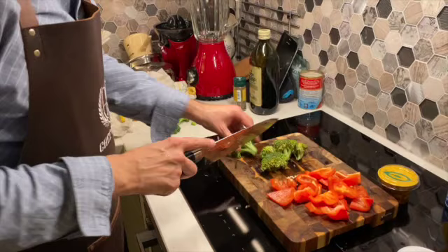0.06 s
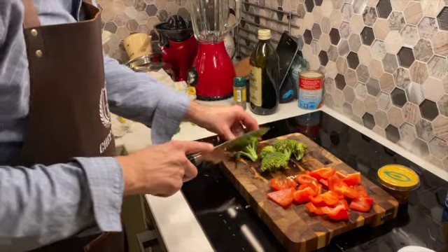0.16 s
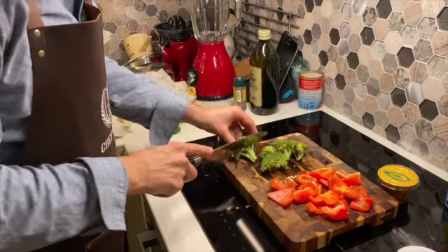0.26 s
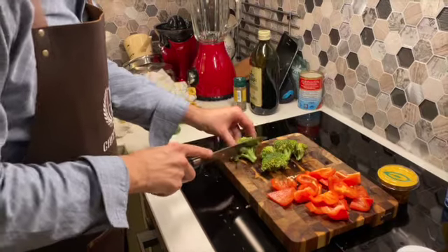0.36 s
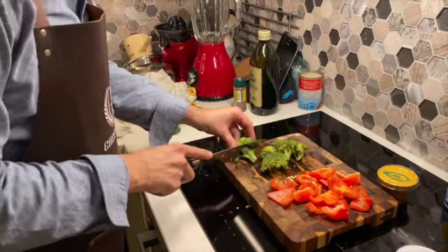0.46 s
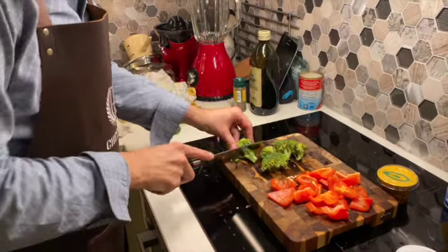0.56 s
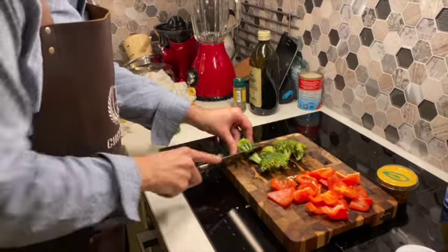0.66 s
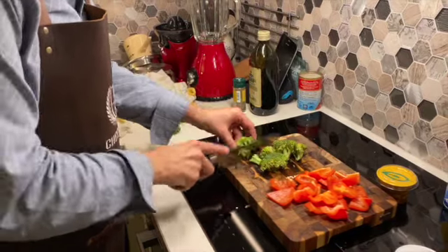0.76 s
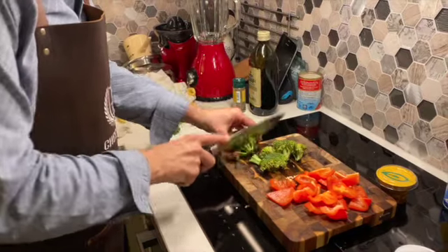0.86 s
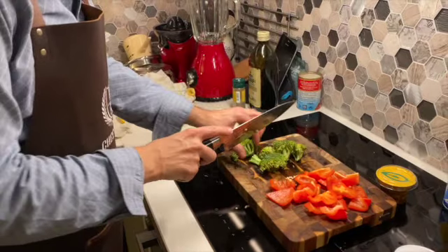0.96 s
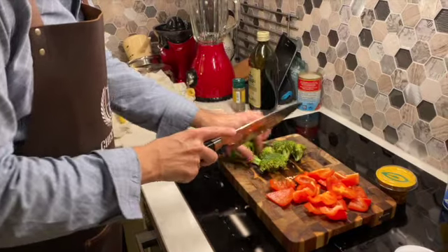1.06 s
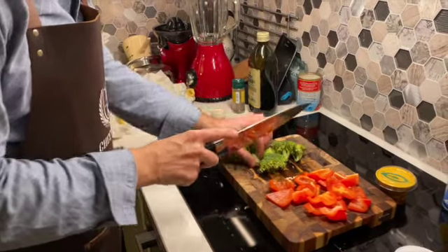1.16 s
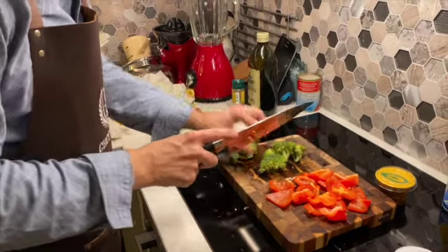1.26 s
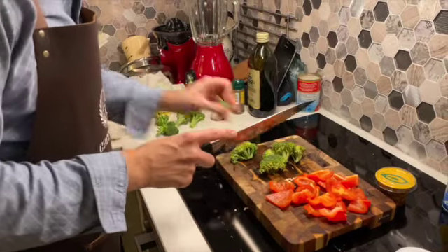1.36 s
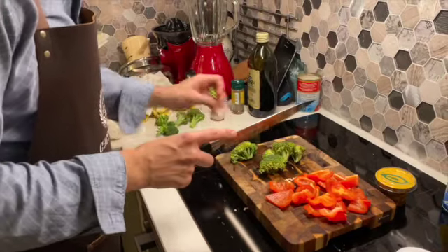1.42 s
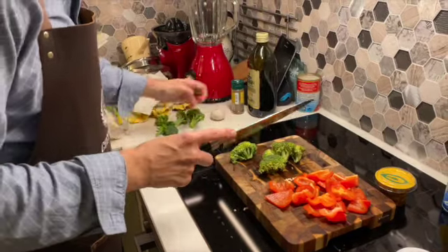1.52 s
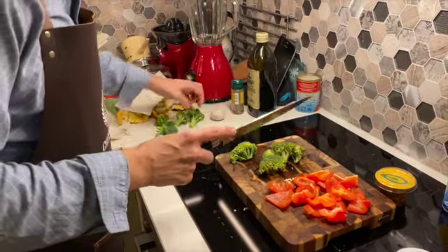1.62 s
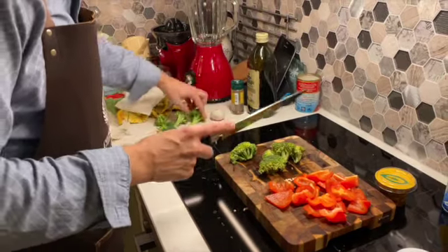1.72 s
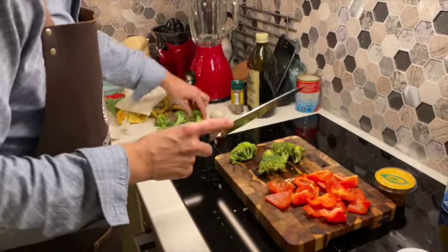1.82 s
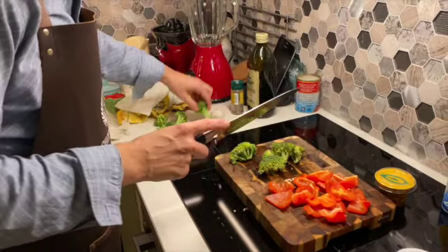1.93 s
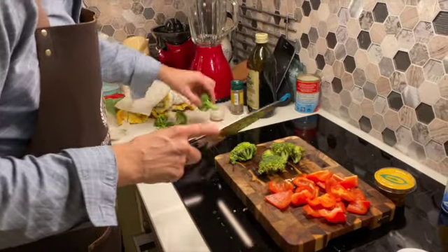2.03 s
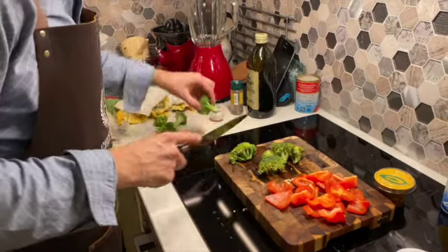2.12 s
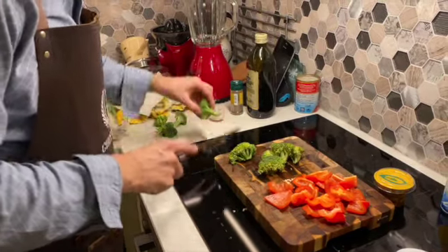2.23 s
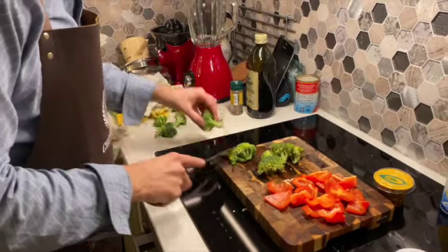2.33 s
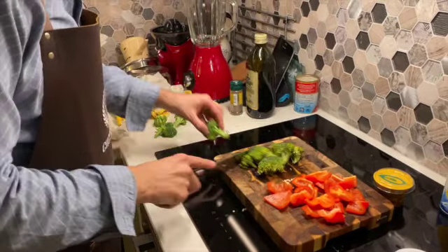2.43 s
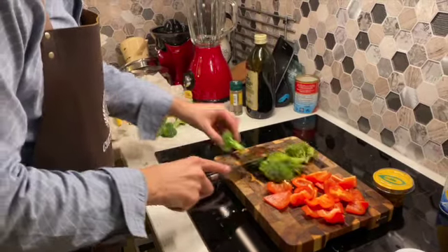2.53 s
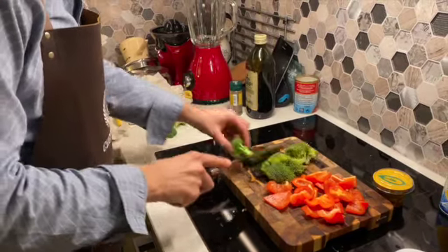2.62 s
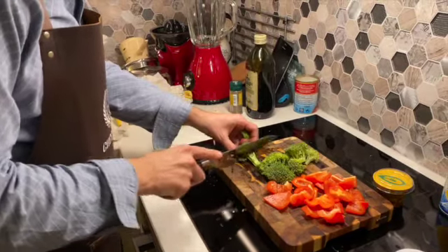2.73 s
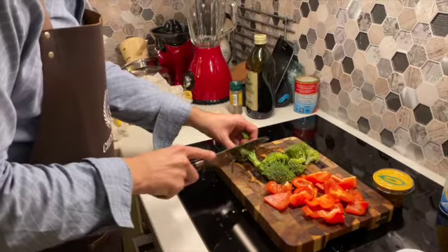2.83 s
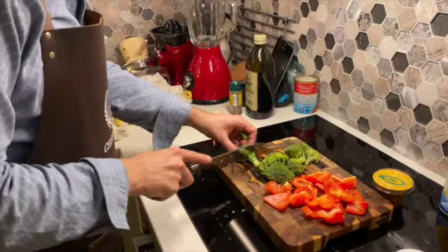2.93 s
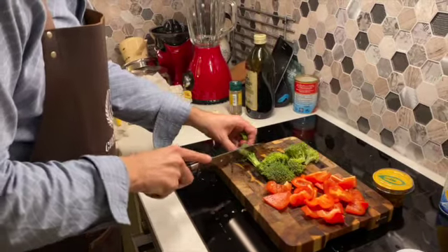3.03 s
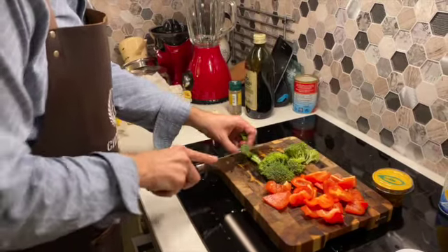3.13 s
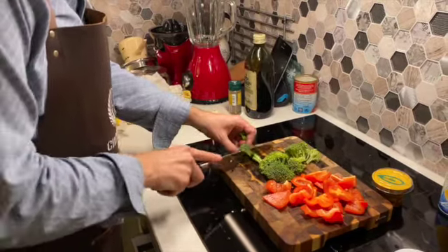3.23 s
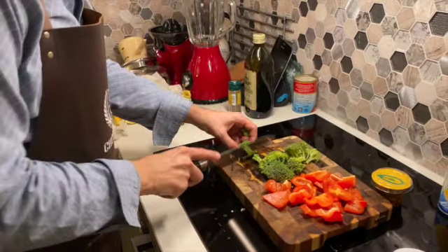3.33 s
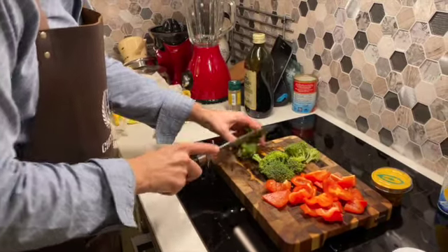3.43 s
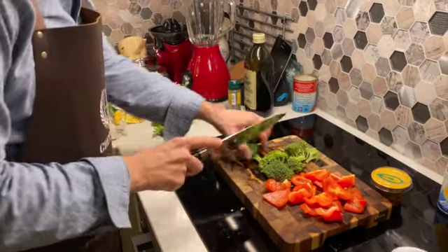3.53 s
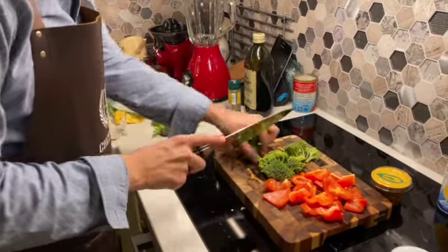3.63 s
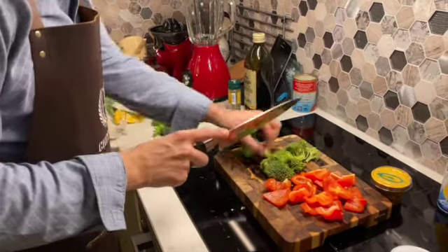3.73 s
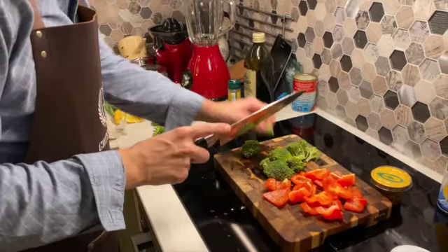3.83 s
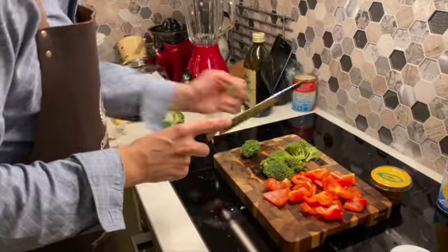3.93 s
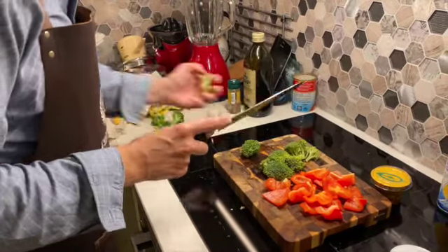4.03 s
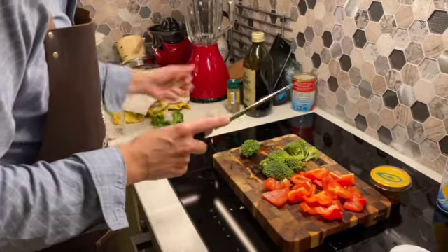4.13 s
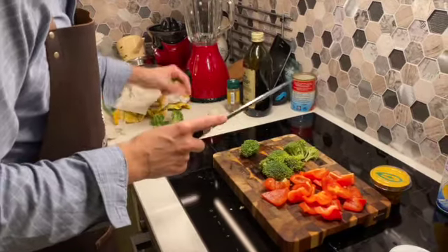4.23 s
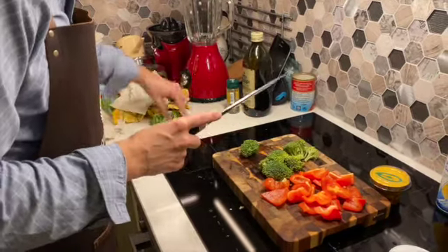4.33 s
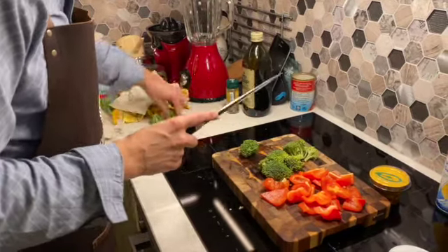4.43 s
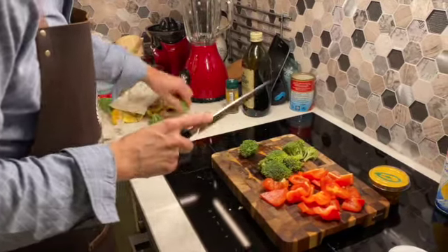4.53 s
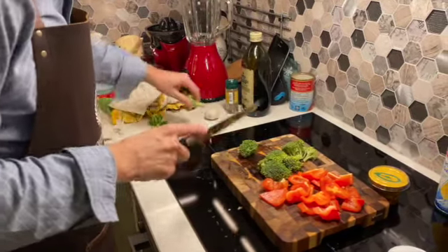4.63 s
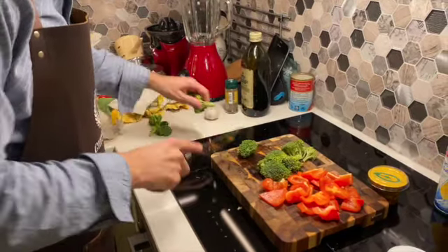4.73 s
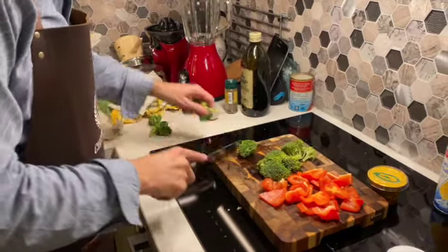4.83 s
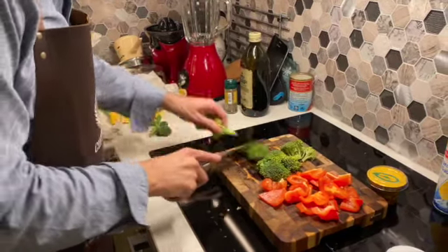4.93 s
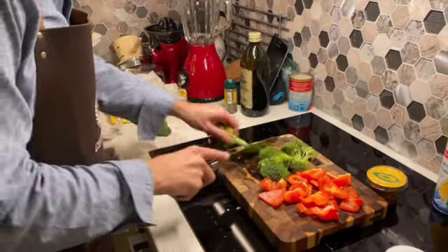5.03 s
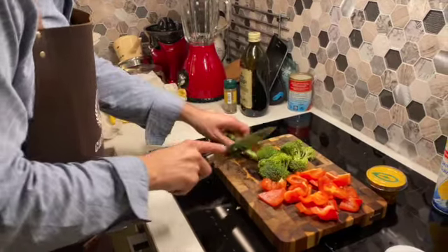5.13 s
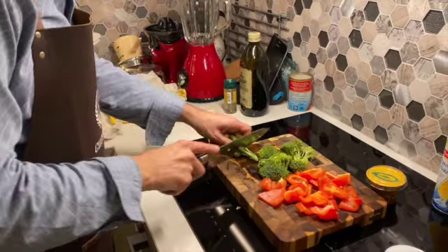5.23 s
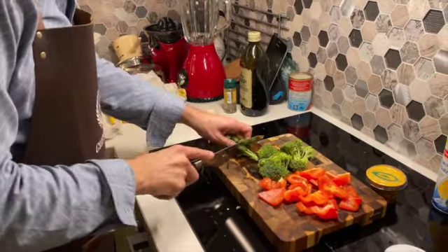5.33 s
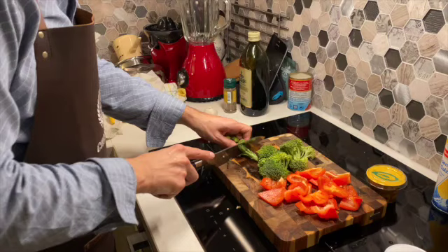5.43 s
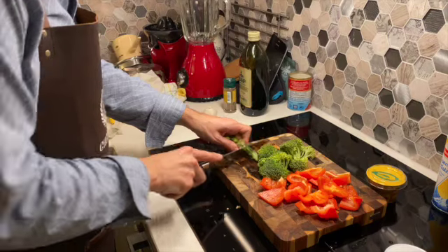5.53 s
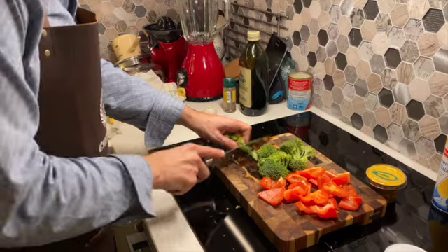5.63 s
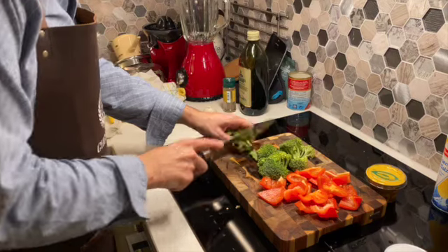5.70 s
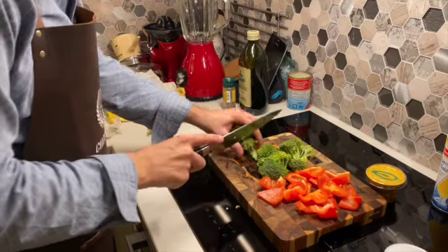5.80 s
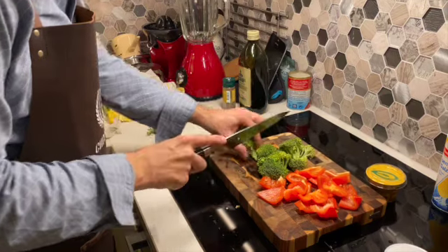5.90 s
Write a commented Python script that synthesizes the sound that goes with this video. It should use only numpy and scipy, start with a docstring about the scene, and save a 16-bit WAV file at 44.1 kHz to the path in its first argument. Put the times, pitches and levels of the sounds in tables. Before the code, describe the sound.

Close, loud chops on a wooden cutting board, each with a crisp stem crunch, separated by sleeve rustle, small ticks and brief steely drags.

```python
"""A chef's knife and a thick wooden board on a glass hob, small kitchen, two microphones close by.
From the start patchy noise makes a low room hum and the rustle of sleeves; scraps tick as short fuzzy rings.
Then chops: dense snaps crunch through a stem, and the blow sounds board and blade as noise and dying sines.
Between chops the blade is set down and dragged, ringing thinly as random slips feed its modes.
Sparse taps give the kitchen's echo; the loudest chops have flattened peaks."""
import sys
import numpy as np
from scipy import signal
from scipy.fft import rfft, irfft
from scipy.io import wavfile
from scipy.ndimage import uniform_filter1d

SR = 44100
rng = np.random.default_rng(int(sys.argv[2]) if len(sys.argv) > 2 else 0)


def log_audio(samples):
    """Write samples as a 16-bit WAV file to the path given in sys.argv[1]."""
    # one column per channel
    frames = np.atleast_2d(samples).T
    # limit to full scale, then quantise
    limited = np.clip(frames, -1, 1)
    pcm = np.round(limited * 32767).astype(np.int16)
    wavfile.write(sys.argv[1], SR, pcm)


N = 262836  # length in samples
STROKE_DEPTH_DB = 36  # how far a drag or a movement lies under its peak at the ends of its rise and fall


def gain_of(db):
    """Amplitude factor for a level in dB."""
    return 10 ** (np.asarray(db) / 20)


def evened(x):
    """Scales x to an RMS of one."""
    return x / np.sqrt(np.mean(x ** 2) + 1e-20)


def clock():
    """Time of every sample in seconds."""
    return np.arange(N) / SR


def read(points, hz):
    """Value of a spectrum table at hz, interpolated along log frequency."""
    f, value = np.transpose(points)
    return np.interp(np.log(hz + 1), np.log(f + 1), value)


def add(mix, s, sound):
    """Mixes a stereo sound in at s seconds."""
    part = mix[:, round(s * SR):][:, :sound.shape[-1]]
    part += sound[..., :part.shape[1]]


def coloured(x, points):
    """Filters x by a spectrum table in dB."""
    hz = np.fft.rfftfreq(x.shape[-1], 1 / SR)
    return irfft(rfft(x) * gain_of(read(points, hz)), x.shape[-1])


def level(strokes):
    """Gain over time from strokes (full at s, hold s, dB, rise s, fall s)."""
    t, total = clock(), 0
    for s, hold, db, rise, fall in strokes:
        before = np.maximum(s - t, 0) / rise
        after = np.maximum(t - s - hold, 0) / fall
        total = total + gain_of(db - STROKE_DEPTH_DB * (before + after))
    return total


def pair(same):
    """Two channels of white noise whose likeness is `same`."""
    a, b = rng.standard_normal((2, N))
    return np.array([a, same * a + np.sqrt(1 - same ** 2) * b])


def rings(modes, t, spread):
    """Dying sines, modes x channels x time; neighbours start in opposite directions, a little apart in each ear."""
    hz, db, t60 = np.transpose(modes)[:3, :, None, None]
    sign = (-1.) ** np.arange(len(modes))[:, None, None]
    apart = spread * np.log2(1 + hz / 300) * np.array([[.5], [-.5]]) * sign
    return sign * gain_of(db - 60 * t / t60) * np.sin(2 * np.pi * hz * t + apart)


def as_curve(gain):
    """A gain over time as (s, dB) rows."""
    return np.transpose([clock(), 20 * np.log10(gain + 1e-5)])


# Left-right likeness of the background. Each row: frequency in Hz, likeness (1 is identical).
LIKENESS = [(60, 1), (180, 0.64), (550, 0.42), (1650, -0.04), (4970, 0.0038), (15000, 0.16)]


def air(points, curve, lo_hz, hi_hz, split_hz, patchy_db):
    """Patchy noise; the curve sets the relative level of band lo-hi and mostly moves what is below split_hz."""
    frames, hz = N // 256 + 5, np.fft.rfftfreq(1024, 1 / SR)
    a, b, c, d, patches = rng.standard_normal((frames, 513, 5)).T
    # smoothing over frequency, then time, makes patches of louder and softer noise
    patches = evened(uniform_filter1d(uniform_filter1d(patches, 14, 0), 10, 1))
    same = np.clip(read(LIKENESS, hz), -1, 1)[:, None]
    left = a + 1j * b
    z = np.array([left, same * left + np.sqrt(1 - same ** 2) * (c + 1j * d)])
    shape = gain_of(read(points, hz))
    db = np.interp(np.arange(frames) * 256 / SR, *np.transpose(curve))
    share = 1 / (1 + (hz[:, None] / split_hz) ** 2)  # treble stays nearer the median level
    z *= shape[:, None] * gain_of(share * db + (1 - share) * np.median(db) + patchy_db * patches)
    band = np.sqrt(np.sum(shape[(hz > lo_hz) & (hz < hi_hz)] ** 2))
    return signal.istft(z, nperseg=1024, noverlap=768)[1][:, :N] / band


# Drift of the low room hum. Each row: time in seconds, relative level in dB.
HUM_DRIFT = [(0.0, -53.5), (0.3, -55), (1.3, -56), (1.76, -59.5), (2.27, -55), (3.0, -56.5), (3.9, -55.5),
             (4.45, -58), (5.2, -55), (5.96, -57.5)]
# Spectrum of the hum as heard. Each row: frequency in Hz, relative density in dB per Hz.
HUM_SPECTRUM = [(15, -37.5), (28, -17), (45, 3), (60, 3), (125, -0.5), (200, -9.5), (400, -15), (800, -26),
                (1600, -31.5), (3200, -36), (7800, -37.5), (9100, -46.5), (10800, -36.5), (12300, -41.5),
                (14000, -58.5)]


def room_hum():
    """The room hums as patchy, drifting noise; after each blow the counter booms on in it."""
    steady = gain_of(np.interp(clock(), *np.transpose(HUM_DRIFT)))
    boom = after_blows(start_db=-47, db_per_s=24.5, follows=.5)
    curve = as_curve(np.hypot(steady, boom))
    return gain_of(3.5) * air(HUM_SPECTRUM, curve, 30, 250, 270, patchy_db=2.0)


# Sleeves and hands moving.
# Each row: full at seconds, hold in seconds, relative level in dB, rise in seconds, fall in seconds.
MOVES = [(0.0, 0.19, -60, .1, 0.16), (0.444, .01, -72, 0.034, 0.14), (1.38, 0.071, -63.5, 0.049, 0.22),
         (1.75, 0.034, -80, 0.24, 0.36), (2.175, 0.12, -56, 0.16, 0.077), (2.898, .005, -81, .015, 0.083),
         (3.02, 0.058, -68, 0.074, 0.11), (3.55, 0.12, -64, 0.54, 0.56), (3.87, 0.23, -66.5, .3, .12),
         (4.232, .01, -74.5, 0.11, 0.13), (4.4, .02, -74.5, 0.088, .25), (4.66, 0.16, -59.5, 0.11, 0.092),
         (5.89, 0.011, -68, 0.37, 0.15)]
# Spectrum of the rustle as heard. Each row: frequency in Hz, relative density in dB per Hz.
RUSTLE_SPECTRUM = [(100, -11.5), (200, -4), (470, -8), (1000, -10.5), (2200, -17), (4500, -22.5),
                   (7600, -22.5), (9000, -39), (11000, -25), (12500, -34), (15500, -52)]


def sleeves():
    """Sleeves rustle as patchy noise with each movement; after each blow a soft hiss lingers in it."""
    hiss = after_blows(start_db=-54.5, db_per_s=36.5, follows=0.94)
    curve = as_curve(np.hypot(level(MOVES), hiss))
    return gain_of(3.5) * air(RUSTLE_SPECTRUM, curve, 1500, 14000, 40000, patchy_db=3.0)


# Small ticks and knocks of scraps and fingers.
# Each row: start in seconds, relative level in dB, pitch in Hz, t60 in seconds, sharpness from 0 to 1.
TICKS = [(0.294, -66.5, 8000, 0.021, 0.3), (0.434, -62, 1880, 0.08, 0.6), (0.457, -56, 1830, 0.064, 0.5),
         (1.09, -37, 75, .2, 0.39), (1.377, -43, 444, 0.21, 0.06), (1.376, -58.5, 1937, 0.16, 0.2),
         (1.377, -67, 2550, 0.25, 0.1), (1.375, -58, 5000, 0.2, 0.55), (1.39, -52, 974, 0.23, 0),
         (1.73, -61, 592, 0.13, 0.54), (2.652, -41, 1168, 0.062, 0.06), (2.652, -51, 1844, 0.046, 0.16),
         (2.705, -48, 585, 0.15, 0.01), (2.895, -58.5, 5030, 0.059, 0.98), (3.299, -33.5, 117, 0.11, 0),
         (3.458, -37, 110.2, 0.15, 0), (3.59, -40, 130, 0.2, 0.25), (4.073, -58, 4020, 0.037, 0.75),
         (4.4, -65, 5004, 0.048, 0.95), (5.291, -55.5, 910, 0.12, .7), (5.416, -58, 2500, .1, 0.07),
         (5.89, -53, 7130, 0.028, 0.8)]


def scraps():
    """Each tick mixes a short fuzzy ring with crisp noise; the sharper, the more noise and the faster its rise."""
    t, out = np.arange(SR // 4) / SR, np.zeros((2, N))
    for s, db, hz, t60, sharp in TICKS:
        fuzz = rng.standard_normal((2, len(t))) + 2.2 * rng.standard_normal(len(t))  # mostly shared
        peak = signal.iirpeak(hz, 6., SR)
        ring = evened(signal.lfilter(*peak, signal.lfilter(*peak, fuzz)))
        crisp = evened(coloured(fuzz, CRUNCH_SPECTRUM))
        rise = 1 - np.exp(-t * hz / (2 + 16 * (1 - sharp)))
        add(out, s, gain_of(db - 60 * t / t60) * rise * ((1 - sharp) * ring + sharp * crisp))
    return gain_of(6.0) * out


# How fast the kitchen's echo dies. Each row: frequency in Hz, t60 in seconds.
KITCHEN_DECAY = [(60, .45), (200, 0.39), (600, 0.43), (1500, 0.31), (4000, 0.38), (8000, 0.25),
                 (14000, 0.29)]


def kitchen(x):
    """The room answers with sparse taps of random sign, each band dying at its own speed."""
    taps = np.zeros((2, SR // 2))
    at = np.arange(160, SR // 2 - 20, 20) + rng.integers(0, 20, (2, (SR // 2 - 161) // 20))
    np.put_along_axis(taps, at, rng.choice([-1., 1.], at.shape), 1)
    taps += .5 * taps[::-1]  # each ear gets some of the other's taps
    hz, t, z = signal.stft(taps, SR, nperseg=512)
    tail = signal.istft(z * gain_of(-60 * t / read(KITCHEN_DECAY, hz)[:, None]), SR, nperseg=512)[1]
    return signal.fftconvolve(x, tail / np.linalg.norm(tail[0]), axes=1)[:, :N]


# The edge splits a stem.
# Each row: breaks through at seconds, relative crunch level in dB, time to get through in seconds.
CUTS = [(0.617, -27.5, 0.12), (3.107, -29.5, 0.11), (5.426, -44, 0.045), (5.476, -27, 0.056)]
CUT_DEPTH_DB, CUT_BEND, CUT_STOP_DB_PER_S = 47.5, .6, 549.5  # growth, its bend (fastest at the end), stop


def cutting():
    """Force on the fibres: grows until the edge is through."""
    t, force = clock(), 0
    for s, db, length in CUTS:
        growth_db = CUT_DEPTH_DB * (np.maximum(s - t, 0) / length) ** CUT_BEND
        stop_db = CUT_STOP_DB_PER_S * np.maximum(t - s, 0)
        force = force + gain_of(db - growth_db - stop_db)
    return force


# Spectrum of the crunch as heard, used for ticks and scraping too.
# Each row: frequency in Hz, relative density in dB per Hz.
CRUNCH_SPECTRUM = [(180, -34.5), (300, -1.5), (3510, -6.5), (6460, -9), (7250, 1.5), (8990, -20),
                   (10400, 0), (11900, -8), (13400, -23), (15500, -10.5)]


def stems():
    """Fibres snap in dense clicks of uneven size, about 5000 a second, over a fainter steady noise."""
    snap_size = gain_of(3. * np.minimum(rng.exponential(1, N), 4))
    snaps = snap_size * (rng.random(N) < 5000 / SR)
    crunch = coloured(snaps * pair(0.22) + 0.25 * pair(.4), CRUNCH_SPECTRUM)
    return gain_of(4.5) * cutting() * evened(crunch)


# How fast the thud dies. Each row: frequency in Hz, t60 in seconds.
THUD_DECAY = [(60, 0.3), (300, .12), (1000, 0.097), (3000, 0.058), (10000, 0.018)]
# Spectrum of the thud as heard. Each row: frequency in Hz, relative density in dB per Hz.
THUD_SPECTRUM = [(40, -20), (100, 1), (500, 1), (1300, -7), (2600, -8), (4000, -18.5), (7600, -27),
                 (9000, -36), (11000, -31), (15500, -43)]


def thud(t):
    """The dull part of a blow: noise in octave bands, each rising and dying at its own speed."""
    noise = rng.standard_normal((2, len(t))) + 1.4 * rng.standard_normal(len(t))
    noise = evened(coloured(noise, THUD_SPECTRUM))
    out = 0
    for hz in 62.5 * 2 ** np.arange(9):
        band = coloured(noise, [(hz / 2, -60), (hz / 1.6, -6), (hz, 0), (hz * 1.25, -6), (hz * 2, -60)])
        out = out + band * (1 - np.exp(-t * hz / 3.7)) * gain_of(-60 * t / read(THUD_DECAY, hz))
    return out


# Board and hob modes. Each row: frequency in Hz, relative level in dB, t60 in seconds, rise in milliseconds.
BOARD_MODES = [(45, -22.5, 0.7, 20), (72.7, -5.5, 0.2, 9.2), (135, -7, 0.28, 11), (253.4, -8.5, 0.087, 7.2),
               (312.6, -2.5, 0.091, 2.2), (383.5, 0.5, 0.089, 3.1), (479, -6.5, 0.12, 4),
               (535.3, -9, 0.18, 2.1), (580, -8.5, 0.095, 8.8), (646, -3.5, 0.094, 4.5),
               (737, -6.5, .1, 2.6), (850, -13, .06, 19), (1026, -36, 0.67, 3), (1025, -36.5, .9, 3),
               (1229, 1.5, .04, 0.99), (1667, -5.5, 0.0082, 1), (1900, -5, 0.033, 0.65),
               (2100, -7.5, 0.012, .6), (2485, -6.5, 0.026, 0.54), (2691, -9, .018, 0.31)]
# Blade modes. Each row: frequency in Hz, relative level in dB, t60 in seconds.
BLADE_MODES = [(765, -7, .19), (1612, -12.5, 0.14), (2544, -8, 0.1), (4080, -2, 0.038), (4770, -6.5, 0.048),
               (6063, -0.5, 0.061), (6970, -10.5, .12), (7130, -5, 0.1), (7900, -7.5, 0.18),
               (8020, -8.5, 0.25), (9900, -11, 0.073), (10200, -10, 0.14), (10580, 4, 0.054),
               (11160, -8, 0.11), (11460, -2.5, 0.12), (12180, -8.5, .12), (14390, -11.5, .1),
               (14880, -13, .1)]
# The blade meets the board. Each row: start in seconds, relative blow level in dB,
# brightness in dB per octave above 1 kHz, heaviness in dB in the bass (full below 150 Hz, gone by 250 Hz),
# blade ring in dB against the blow, extra dB for the blade's slow flexing,
# left over right in dB before the microphones colour it.
BLOWS = [(0.6179, 5, 1, -1.5, -48.5, 1, 0.5), (2.2874, -8.5, -3.5, 0.5, -37.5, 13, 1.),
         (2.318, -27.5, -3.5, -2.5, -15, 22, -3), (2.4924, -20, -0.5, 9.5, -8, 3.5, -1),
         (3.109, 2, -0.5, 2.5, -49.5, 2.5, 0), (4.7955, -2.5, -1.5, -4, -39.5, -2.5, 1.5),
         (5.4769, 4, -1.5, 1, -81, 2.5, 1)]
PUNCH_DB, PUNCH_S = 3.5, 0.0023  # extra force on the thud in the first instant, and how fast it fades


def blows():
    """Each blow shakes board and blade: modes ring as dying sines, and the board thuds."""
    t, out = np.arange(SR // 2) / SR, np.zeros((2, N))
    rise_ms = np.transpose(BOARD_MODES)[3, :, None, None]
    # bending waves: treble arrives first
    board = rings(BOARD_MODES, t, spread=0.24) * (1 - np.exp(-1000 * t / rise_ms))
    blade = rings(BLADE_MODES, t, spread=.3)
    flexing = np.transpose(BLADE_MODES)[0, :, None, None] < 2000
    for s, db, bright_db, heavy_db, blade_db, flex_db, pan_db in BLOWS:
        spot = gain_of(1.5 * rng.standard_normal((len(BOARD_MODES), 1, 1)))  # where the edge lands
        punch_db = PUNCH_DB * np.exp(-t / PUNCH_S)
        wood = gain_of(-8.5) * (spot * board).sum(0) + gain_of(-1.5 + punch_db) * thud(t)
        wood = np.pad(wood, ((0, 0), (0, SR // 10)))  # room for the filter to ring out
        wood = coloured(wood, [(150, heavy_db), (250, 0), (1000, 0), (16000, 4 * bright_db)])[:, :len(t)]
        uneven_db = 2.5 * rng.standard_normal((len(BLADE_MODES), 1, 1))
        steel = (gain_of(blade_db + flex_db * flexing + uneven_db) * blade).sum(0)
        add(out, s, gain_of(db + np.array([[pan_db], [-pan_db]]) / 2) * (wood + steel))
    return out


def after_blows(start_db, db_per_s, follows):
    """Gain that each blow starts, rising `follows` dB per dB of blow, and that dies slowly."""
    t = clock()
    return sum((t > s) * gain_of(start_db + follows * db - db_per_s * np.maximum(t - s, 0))
               for s, db, *_ in BLOWS)


# The edge drags along the wood. Each row: full at seconds, hold in seconds, relative pressure in dB,
# rise in seconds, fall in seconds, blade mode it favours in Hz, by how many dB.
DRAGS = [(2.328, 0.0081, -28, 0.038, 0.051, 10580, 6), (2.49, 0.032, -35, 0.0037, 0.024, 6020, 15),
         (4.846, 0.036, -31.5, 0.054, 0.017, 6020, 14)]


def singing():
    """A dragged edge feeds the blade with tiny slips; the point of contact favours one mode."""
    t = np.arange(SR // 2) / SR
    blade = rings(BLADE_MODES, t, spread=.3)
    slips = rng.standard_normal(N) * gain_of(5.0 * rng.standard_normal(N))
    modes_hz, out = np.transpose(BLADE_MODES)[0, :, None, None], 0
    for *stroke, hz, favour_db in DRAGS:
        favoured = gain_of(favour_db * (abs(modes_hz / hz - 1) < .02))
        shaken = (favoured * blade).sum(0) * gain_of(-200. * t)  # the hand pressing the edge down damps the ring
        shaken /= np.linalg.norm(shaken[0])
        out = out + signal.fftconvolve((level([stroke]) * slips)[None], shaken, axes=1)[:, :N]
    return gain_of(-6.0) * out


def scraping():
    """The edge rubs the wood: noise that follows its pressure."""
    pressure = level([row[:5] for row in DRAGS])
    return gain_of(-2.5) * pressure * evened(coloured(pair(.3), CRUNCH_SPECTRUM))


# How much the two close microphones differ on near sounds.
# Each row: frequency in Hz, gain of the left-right difference in dB.
MICROPHONE_DIFFERENCE = [(60, -10), (200, -6.5), (500, 3.5), (2000, 2.5), (10000, -0.5)]


def scene():
    """Knife, stems and scraps close to the microphones in the kitchen, over hum and rustle."""
    near = scraps() + stems() + blows() + singing() + scraping()
    left, right = near + gain_of(-10.5) * kitchen(near)
    mid = (left + right) / 2
    side = coloured(left - right, MICROPHONE_DIFFERENCE) / 2  # long waves reach both microphones alike
    return np.array([mid + side, mid - side]) + sleeves() + room_hum()


def record(dry):
    """The left microphone is a little hotter; peaks are cut flat at 0.97, then a low-pass."""
    flattened = np.clip(dry * gain_of([[.6], [-.6]]), -.97, .97)
    low_pass = signal.firwin(255, 15600, window=("kaiser", 9), fs=SR)  # cutoff in Hz
    return signal.oaconvolve(flattened, low_pass[None], "same")


dry = scene()
out = record(dry)
log_audio(out)
```